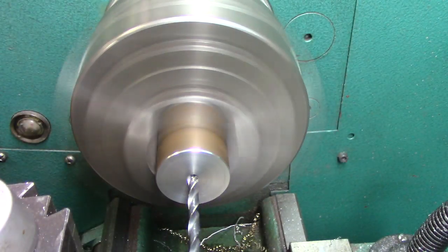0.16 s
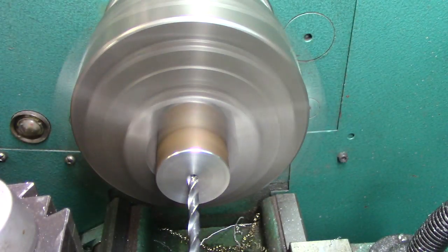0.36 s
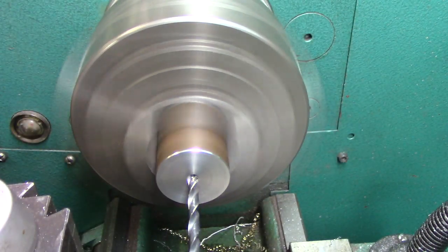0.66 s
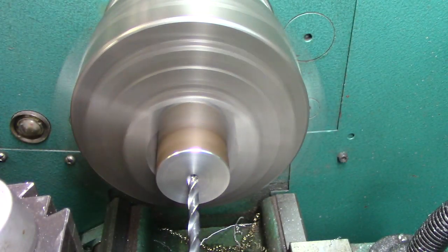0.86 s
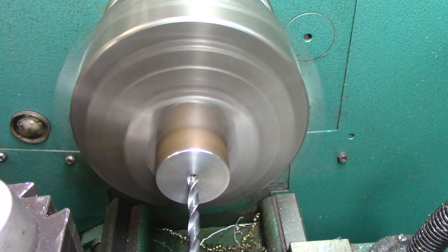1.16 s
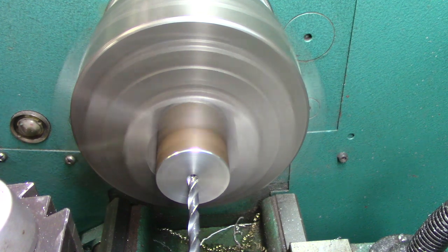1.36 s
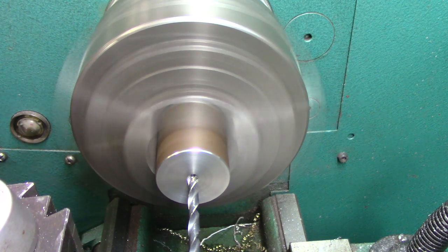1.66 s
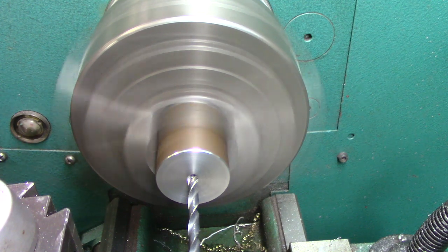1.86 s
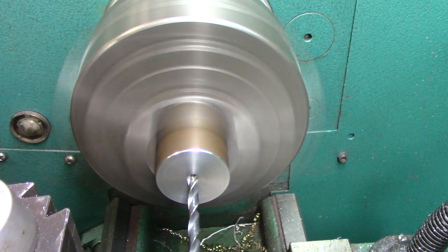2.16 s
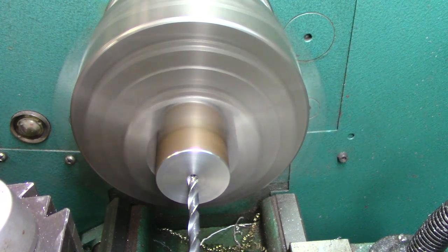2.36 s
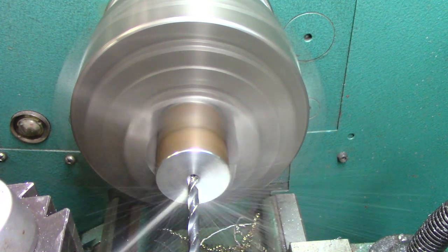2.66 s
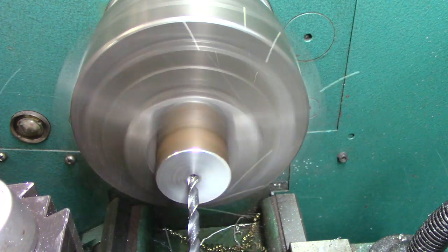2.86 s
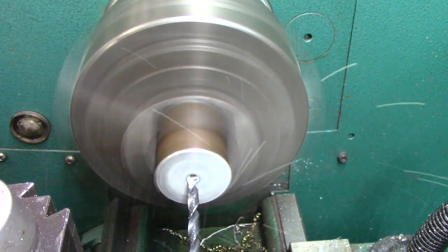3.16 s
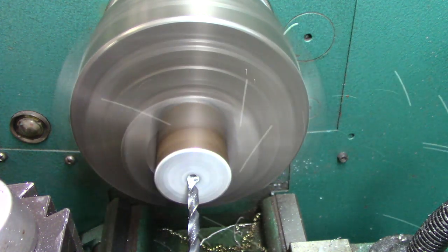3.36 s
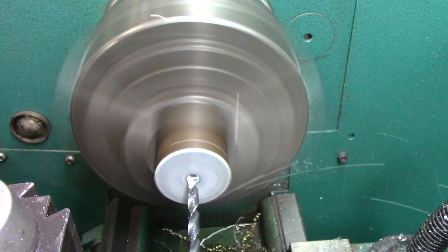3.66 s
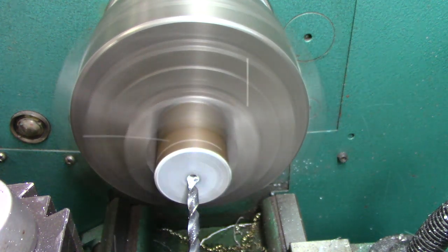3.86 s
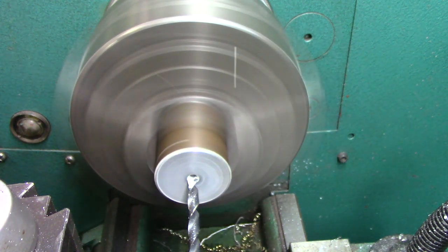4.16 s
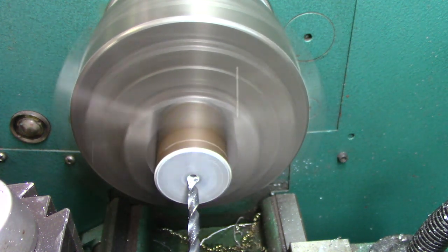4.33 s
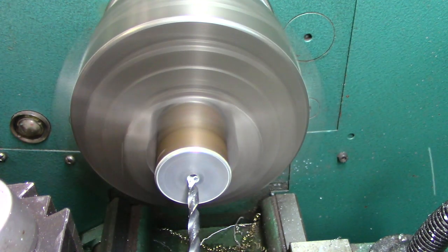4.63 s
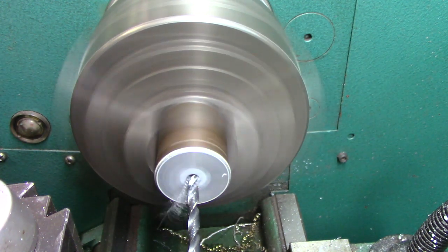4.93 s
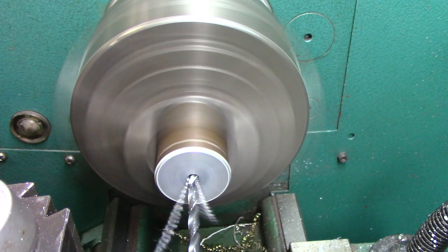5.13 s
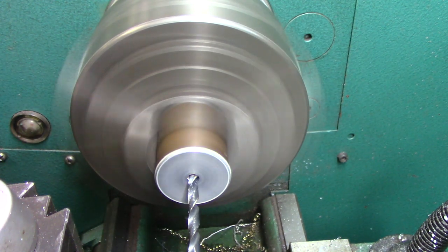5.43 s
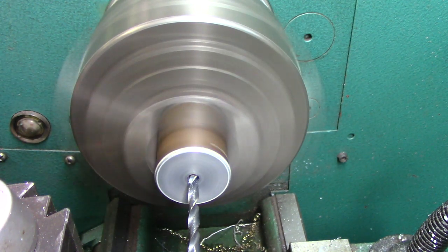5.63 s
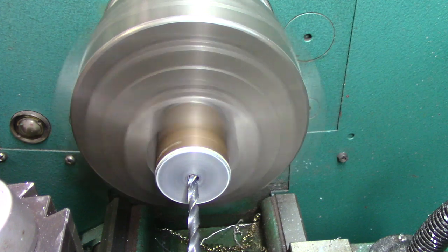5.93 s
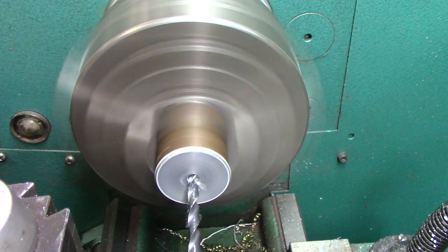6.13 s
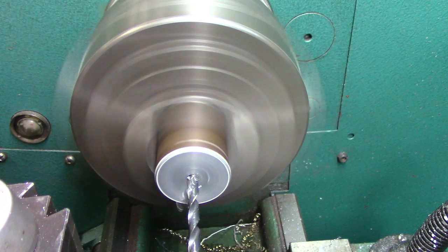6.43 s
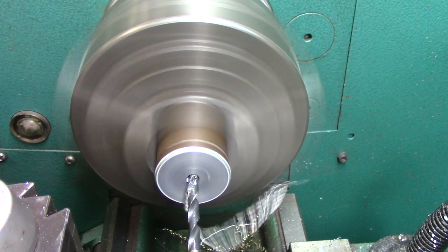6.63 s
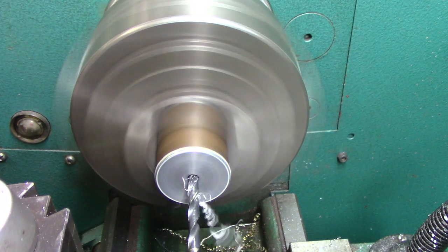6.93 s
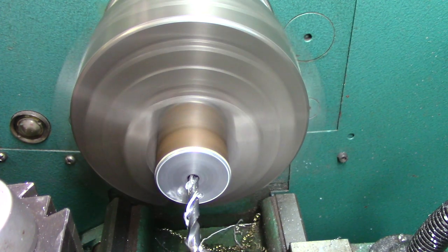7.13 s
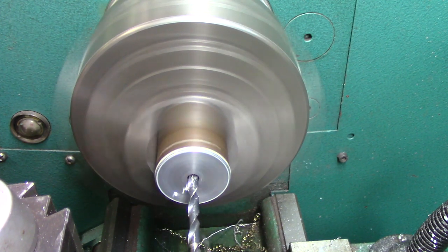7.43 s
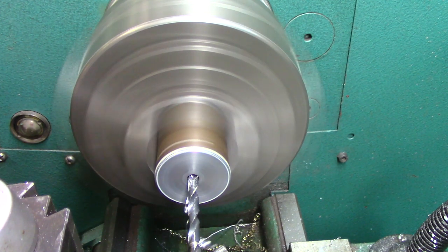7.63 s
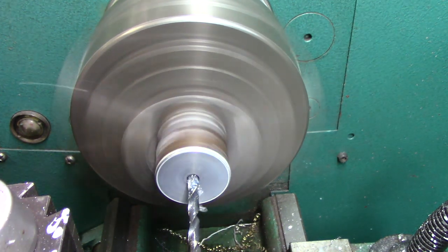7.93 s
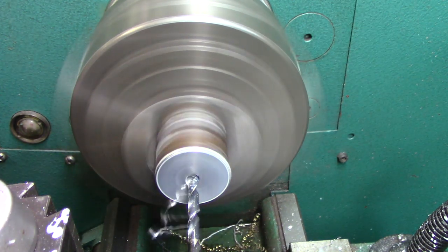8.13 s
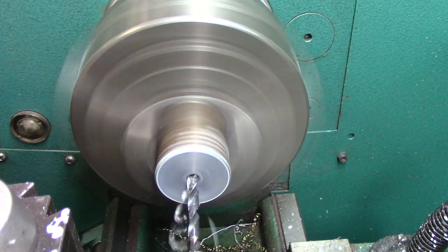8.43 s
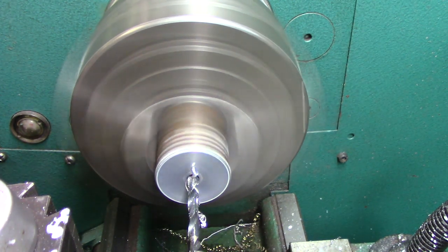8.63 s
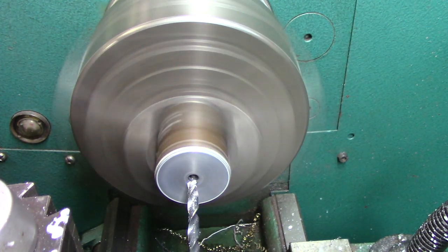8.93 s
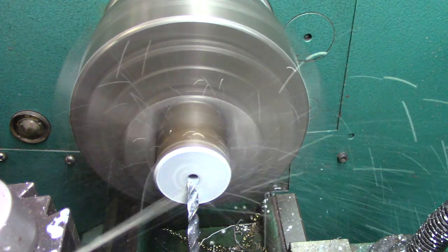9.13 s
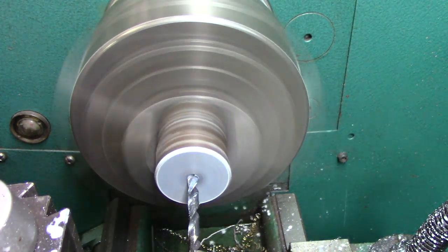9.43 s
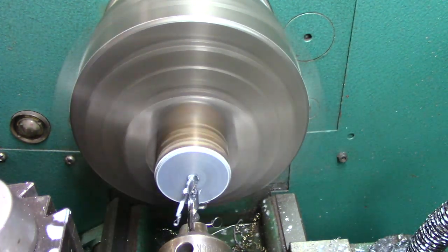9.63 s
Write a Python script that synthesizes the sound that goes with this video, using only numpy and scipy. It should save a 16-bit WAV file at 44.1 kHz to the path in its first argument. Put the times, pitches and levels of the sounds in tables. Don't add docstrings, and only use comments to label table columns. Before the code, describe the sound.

Close in a workshop, a metal lathe drones steadily, mid-pitched gear whine over rough casting rumble. Two short wet coolant spurts spatter near three seconds. Suddenly everything is speeded up tenfold: a thin piercing whine and bright hiss with small metallic ticks. The spindle clicks off, almost falls silent with a faint ring, clunks on again and the shrill drilling continues. The same close microphone signal on both channels.

```python
import sys
import numpy as np
from scipy import signal
from scipy.fft import rfft, irfft, next_fast_len
from scipy.io import wavfile
from scipy.ndimage import uniform_filter1d

SR = 44100
rng = np.random.default_rng(int(sys.argv[2]) if len(sys.argv) > 2 else 0)


def wav_record(signal):
    frames = np.transpose(np.atleast_2d(signal))
    bounded = np.clip(frames, -1, 1)
    quanta = np.round(bounded * 32767).astype(np.int16)
    wavfile.write(sys.argv[1], SR, quanta)


def attenuation_scalar(level_db):
    decades = np.asarray(level_db, float) / 20
    return 10 ** decades


N = 431738

# pitch_hz, level_db (per Hz)
RUMBLE_COLOUR = [(18, -83.5), (30, -55.5), (120, -51), (233, -31), (437, -6.5), (684, -10.5), (801, -6.5),
                 (1070, -5.5), (1190, -6.5), (1280, -6.5), (2610, -13.5), (2830, -14), (4300, -23),
                 (5040, -26.5), (16000, -54.5)]
CASTING_HZ = [357, 405, 428, 440, 490, 505, 512, 536, 560, 580, 596, 697, 735, 762, 826, 862, 899, 925,
              1016, 1050, 1125, 1140, 1198, 1268, 1287, 1357, 1465, 1598, 335, 2800, 176, 631]
# width_hz, level_db (negative = cancellation)
CASTING_SHAPES = [(8.07, 8), (7.8, 5), (16.4, 7.5), (6.12, -16), (8, 4.5), (4, 7), (7.97, -7.5), (9, 10.5),
                  (8.104, 0.5), (7.8, 11), (6, -4), (14.13, -1.5), (8, 9), (14, 4.5), (16.06, 8), (9.9, 3),
                  (13.76, 9.5), (29, 3), (14.2, -3), (8.09, 2.5), (5.9, 0.5), (15.94, 8), (29.97, 6),
                  (13, 8), (10, -7.5), (12, 4), (14, 3.5), (13.93, 4.5), (30, -7.5), (30.38, 1),
                  (23.98, 4.5), (7, 6)]
BAND_TOPS_HZ = [445, 650, 1200]
# normal_level_db, tenfold_level_db, full_cut_gain_db, winding_gain_db
RUMBLE_BANDS = [
    (-40.5, -42.5, -0.5, 2),
    (-42.5, -44, -1.5, 0.5),
    (-35, -36, 0.3, 0.6),
    (-33, -40.5, 2.1, 0.8),
]
MESH_HZ = [400, 452.5, 316, 294.5, 273.8, 900, 452.5]
MESH_HARMONICS = [
    [1, 2, 3, 4, 5, 7],
    [1, 2, 3, 5, 11, 13, 14],
    [1, 2, 3, 4],
    [1, 3],
    [1, 2],
    [1],
    [12],
]
# wobble (0-1, once a spindle turn), ease_db (per 0.1 % of speed as the load eases),
# harmonic_levels_db
MESH_VOICES = [(0.2, -.3, [-22, -11, 0, -12.5, -20, -18]), (.05, .3, [-10, -22, -18, -18, -25.5, -34, -41]),
               (.05, -0.5, [-22, -20, -19.5, -26.5]), (0.051, -0.1, [-28, -25.5]), (.05, -0.5, [-40, -29]),
               (0.101, 0.5, [-26]), (.5, -2.2, [-31])]
# start_s, end_s, depth (1 = full cut); until 1.16 s the speed
PECKS = [(-1, 1.16, 1.5), (1.16, 4.53, .4), (4.75, 5.12, .5), (5.25, 5.55, .3), (6.07, 7.12, .9),
         (7.17, 7.69, 1.1), (7.93, 8.6, 1.05), (9.64, 11, .75)]
# start_s, end_s, strength
WINDS = [(4.5, 4.9, .8), (5.06, 5.23, .9), (7.68, 7.93, .8), (8.88, 9.4, 1)]
# start_s, change_db
LEVEL_STEPS = [
    (1.16, 1.94),
    (5.232, -4),
]
# start_s, peak_db, length_s
SPURTS = [(2.627, -31, 0.016), (2.65, -29, 0.029), (2.676, -23.5, .017), (2.69, -31, 0.028),
          (2.723, -45, 0.022), (2.908, -33.5, 0.019), (2.923, -32, 0.014), (2.937, -31.5, 0.044),
          (2.958, -26.5, .035), (2.986, -38, .012), (3.008, -39, .007), (4.023, -56, 0.2)]
# start_s, peak_db, centre_hz
DRIPS = [(2.804, -47.5, 8100), (2.897, -48, 8600), (3.042, -51, 13080), (3.05, -46, 8500),
         (3.074, -49, 9600)]
# start_s, pitch_hz, peak_db
SWARF = [(4.82, 7250, -25), (4.845, 7350, -26), (4.865, 7300, -28), (5.17, 4640, -32), (6.058, 5510, -27),
         (6.078, 5450, -35), (6.082, 3600, -33), (6.102, 5400, -36), (6.135, 4730, -32),
         (6.218, 4780, -30.5), (7.155, 12280, -29)]
# start_s, pitch_hz, peak_db, crack_db
CLUNKS = [
    (5.715, 3700, -33, -36),
    (5.815, 2300, -47, -29),
    (5.818, 9200, -35, -40),
    (5.836, 9000, -35, -33),
    (5.981, 5200, -28, -30),
    (5.981, 2400, -41, -36),
    (5.997, 9800, -33, -32),
]
# pitch_hz, peak_db, t60_s
FRAME = [(4890, -48, .36), (2740, -67, .8), (8400, -52, .36)]

SPEEDUP_S, SPEEDUP_FADE_S, SLOW, FAST = 4.533, .003, 1, 10
SLACK_S, REST_S, COAST_BEND, COAST_DB, REST_DB = 5.66, 5.962, 3.0, 24.0, -36
STOP_S, KICK_S, KICK_RISE_S, START_S = 5.818, 5.976, .0047, 6.004
CUTOFF_HZ = 15750
LOUDEST_HZ, TEETH, IDLE_HZ, SAG_HZ, CHATTER_HZ = 1200, 96, 1200.9, 3.3, .7
WHINE_SLOW_DB, WHINE_FAST_DB, WHINE_LOAD_DB, WHINE_FADE = -31.5, -31.5, -.06, 3.5
FEED_S = .07
SPURT_LOW_HZ, SPURT_HIGH_HZ, RISE_SHARE, FULL_JET_DB, WIDEN = 6400, 15200, .15, -29, .9
DRIP_S, DRIP_SPREAD = .007, 1.25
SWARF_T60_S, SWARF_CRACK_DB, CLUNK_T60_S = .04, -22, .024
OVERLOAD, KNEE = .26, 6.0
CRACKLE_DB, CRACKLE_LEVEL, CRACKLE_POWER = -50.5, .031, 2.0


def rms_one(x):
    return x / np.sqrt(np.mean(x ** 2) + 1e-20)


def drift(rate):
    pole = np.exp(-16 * np.pi * rate / SR)
    noise = rng.standard_normal(N // 8 + 9002)
    slow = signal.lfilter([1], [1, -2 * pole, pole * pole], noise)[9000:]
    return np.interp(np.arange(N) / 8, np.arange(len(slow)), rms_one(slow))


def ramp(start, length):
    return np.clip((np.arange(N) / SR - start) / length, 0, 1)


def effort(rows):
    return sum(depth * (ramp(start - FEED_S / 2, FEED_S) - ramp(end - FEED_S / 2, FEED_S))
               for start, end, depth in rows)


def ring(clicks, hz, t60):
    r, w = attenuation_scalar(-60 / (t60 * SR)), 2 * np.pi * hz / SR
    return signal.lfilter([0, np.sin(w)], [1, -2 * r * np.cos(w), r * r], clicks)


def room_ripple(depth_db, spacing_hz, start_hz):
    hz = np.arange(0, SR / 2, spacing_hz)
    return hz, depth_db * rng.standard_normal(len(hz)) * (hz > start_hz)


def rumble(levels_db, pace, ripple, flicker_db):
    size = next_fast_len(N)
    hz = np.maximum(np.arange(size // 2 + 1) * SR / size / pace, 1)
    knot_hz, knot_db = np.transpose(RUMBLE_COLOUR)
    colour_db = np.interp(np.log(hz), np.log(knot_hz), knot_db)
    colour_db += np.interp(hz, *ripple)
    for centre_hz, (width_hz, db) in zip(CASTING_HZ, CASTING_SHAPES):
        colour_db += db / (1 + (2 * (hz - centre_hz) / width_hz) ** 2)
    noise = rfft(rng.standard_normal(size)) * attenuation_scalar(colour_db) * (hz * pace < CUTOFF_HZ)
    below = [0] + [1 / (1 + (hz / top) ** 10) for top in BAND_TOPS_HZ] + [1]
    bands = [irfft(noise * (upper - lower), size)[:N] for lower, upper in zip(below, below[1:])]
    flicker = flicker_db * drift(20.0 * pace)
    return sum(attenuation_scalar(db + flicker) * rms_one(band) for db, band in zip(levels_db, bands))


def spin_db():
    coasting = 1 - ramp(SLACK_S, REST_S - SLACK_S) ** COAST_BEND
    speed = np.maximum(coasting, ramp(KICK_S, KICK_RISE_S))
    return np.maximum(COAST_DB * np.log10(speed + 1e-9), REST_DB)


def knocks():
    out, t = np.zeros(N), np.arange(int(.165 * SR)) / SR
    hits = [(s, hz, db, SWARF_T60_S, db + SWARF_CRACK_DB) for s, hz, db in SWARF]
    hits += [(s, hz, db, CLUNK_T60_S, crack_db) for s, hz, db, crack_db in CLUNKS]
    hits += [(STOP_S, hz, db, t60, -np.inf) for hz, db, t60 in FRAME]
    for s, hz, db, t60, crack_db in hits:
        rub = rng.standard_normal(len(t)) * np.exp(-t / .004)
        tone = ring(rub, hz, t60)
        crack = np.diff(rub, prepend=0)
        at = round(s * SR)
        out[at:at + len(t)] += attenuation_scalar(db) * tone / np.abs(tone).max() + attenuation_scalar(crack_db) * crack
    return signal.sosfilt(signal.butter(6, 2000, "high", fs=SR, output="sos"), out)


def coolant():
    out, t = np.zeros(N), np.arange(int(.3 * SR)) / SR
    jets = []
    for s, db, length in SPURTS:
        low_hz = SPURT_LOW_HZ / attenuation_scalar(WIDEN * max(db - FULL_JET_DB, 0))
        jets.append((s, db, length, low_hz, SPURT_HIGH_HZ))
    jets += [(s, db, DRIP_S, hz / DRIP_SPREAD, hz * DRIP_SPREAD) for s, db, hz in DRIPS]
    for s, db, length, low_hz, high_hz in jets:
        clumps = np.repeat(rng.standard_normal(len(t)), 90)[:len(t)]
        droplets_db = 2.0 * rng.exponential(1, len(t)) + 1.6 * clumps
        spatter = rng.standard_normal(len(t)) * attenuation_scalar(droplets_db)
        band = signal.butter(3, [low_hz, high_hz], "band", fs=SR, output="sos")
        hiss = signal.sosfilt(band, spatter)
        pockets_hz = rng.uniform(max(low_hz, SPURT_LOW_HZ), high_hz, size=12)
        whistles = sum(ring(hiss, hz, .009) for hz in pockets_hz)
        rise = 1 - np.exp(-t / (RISE_SHARE * length))
        shape = rise * np.exp(-(t / length) ** 3)
        at = round(s * SR)
        out[at:at + len(t)] += attenuation_scalar(db) * shape * (rms_one(hiss) + .64 * rms_one(whistles))
    return out


def gears(hz, level_db, pace, heard, flicker_db):
    hz, level_db = hz[heard], level_db[heard]
    unsteady_hz = hz * (1 + .0004 * drift(3 * pace)[heard])
    turn = 2 * np.pi * np.cumsum(unsteady_hz) / SR / LOUDEST_HZ
    ease = 1000 * (hz / LOUDEST_HZ / pace - .999)
    spindle = np.exp(-1j * turn * LOUDEST_HZ / TEETH)
    side_tones = spindle + .45 * spindle ** 2 + .3 * spindle.conj()
    out = np.zeros(N)
    for mesh_hz, harmonics, (wobble, ease_db, levels_db) in zip(MESH_HZ, MESH_HARMONICS, MESH_VOICES):
        runout = 1 + wobble * side_tones
        gain = attenuation_scalar(level_db + ease_db * ease + flicker_db * drift(7.74 * pace)[heard]) * runout
        for k, db in zip(harmonics, levels_db):
            phase = 2 * np.pi * rng.random()
            if k * mesh_hz * pace < CUTOFF_HZ:
                out[heard] += attenuation_scalar(db) * (gain * np.exp(1j * (k * mesh_hz * turn + phase))).real
    return np.sqrt(2) * out


def scene():
    t, cut, wind = np.arange(N) / SR, effort(PECKS), effort(WINDS)
    ripple = room_ripple(depth_db=2.2, spacing_hz=14, start_hz=1640)
    level_db = sum(db * ramp(s, .0071) for s, db in LEVEL_STEPS)
    later = ramp(SPEEDUP_S, SPEEDUP_FADE_S)
    hz = IDLE_HZ - SAG_HZ * cut

    slow_db = [db + level_db for db, *_ in RUMBLE_BANDS]
    slow = rumble(slow_db, SLOW, ripple, flicker_db=.9) + coolant()
    slow += gears(SLOW * hz, WHINE_SLOW_DB + level_db, SLOW, later < 1, flicker_db=.9)

    spin = spin_db()
    fast_db = [db + cut_db * cut + wind_db * wind + level_db + spin
               for _, db, cut_db, wind_db in RUMBLE_BANDS]
    fast = rumble(fast_db, FAST, ripple, flicker_db=-.33) + knocks()
    running = np.clip(np.maximum(STOP_S - t, t - START_S) / .00385, 0, 1)
    chattering_hz = hz + CHATTER_HZ * cut * drift(60.0)
    whine_db = WHINE_FAST_DB + level_db + WHINE_LOAD_DB * cut + WHINE_FADE * spin
    fast += running * gears(FAST * chattering_hz, whine_db, FAST, later > 0, flicker_db=1.2)
    return np.tile((1 - later) * slow + later * fast, (2, 1))


def band_limit(x):
    return signal.sosfilt(signal.butter(12, 16430, fs=SR, output="sos"), x)


def record(dry):
    loudness = np.sqrt(uniform_filter1d(dry ** 2, size=1764) + 1e-12)
    grit = signal.sosfilt(signal.butter(2, 1300, fs=SR, output="sos"), rng.standard_normal(N))
    crackle_level = CRACKLE_LEVEL * (loudness / CRACKLE_LEVEL) ** CRACKLE_POWER
    crackle = crackle_level * rms_one(grit) * attenuation_scalar(CRACKLE_DB + 3.2 * drift(80))
    rounded = dry / (1 + np.abs(dry / OVERLOAD) ** KNEE) ** (1 / KNEE)
    steep = signal.ellip(12, .5, 70, CUTOFF_HZ, fs=SR, output="sos")
    mix = signal.sosfilt(steep, rounded + crackle)
    return band_limit(mix)


dry = scene()
out = record(dry)
wav_record(out)
```